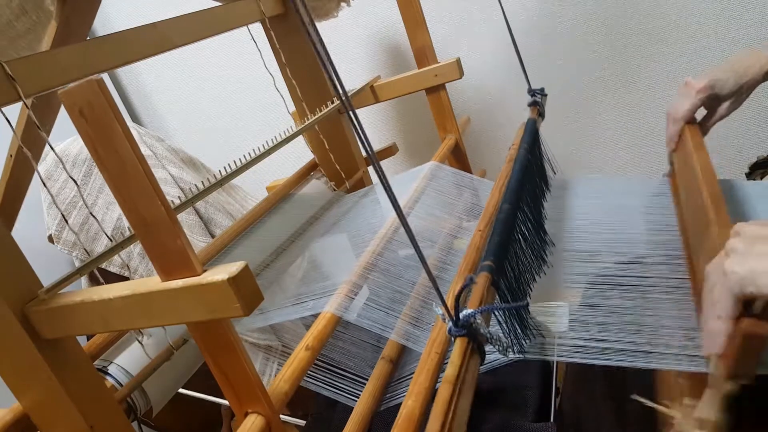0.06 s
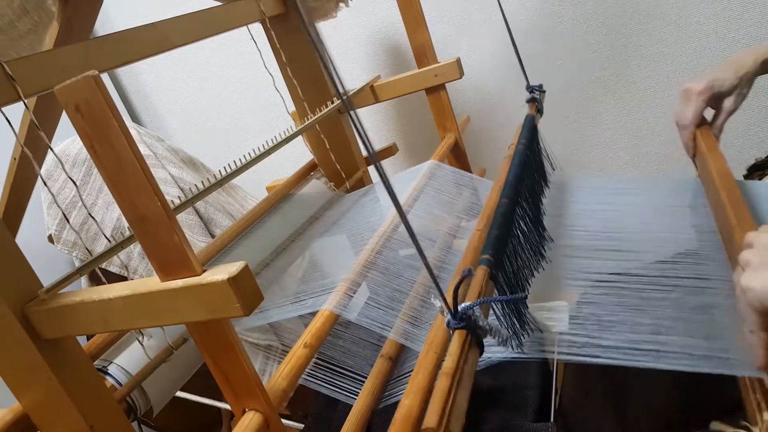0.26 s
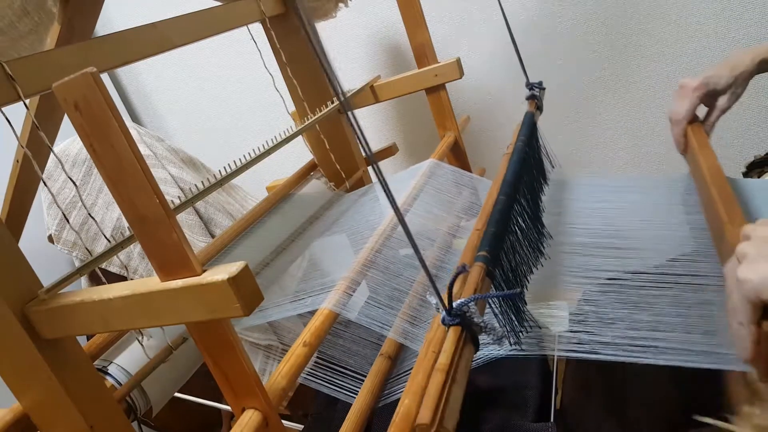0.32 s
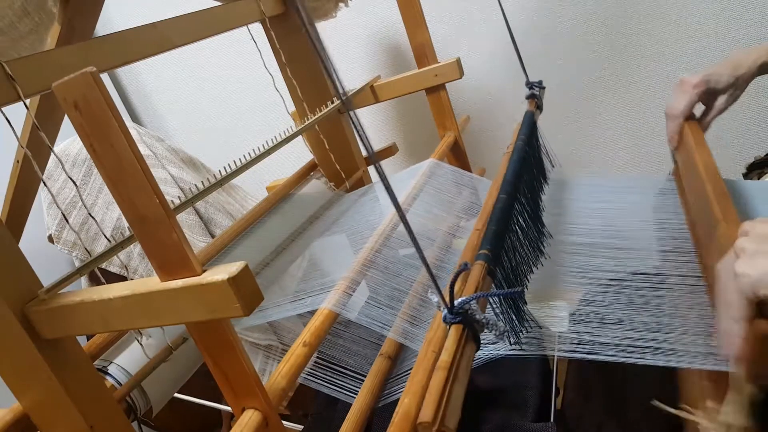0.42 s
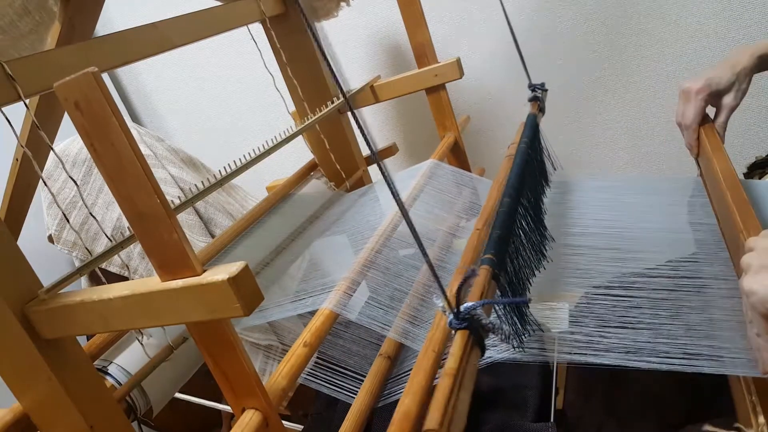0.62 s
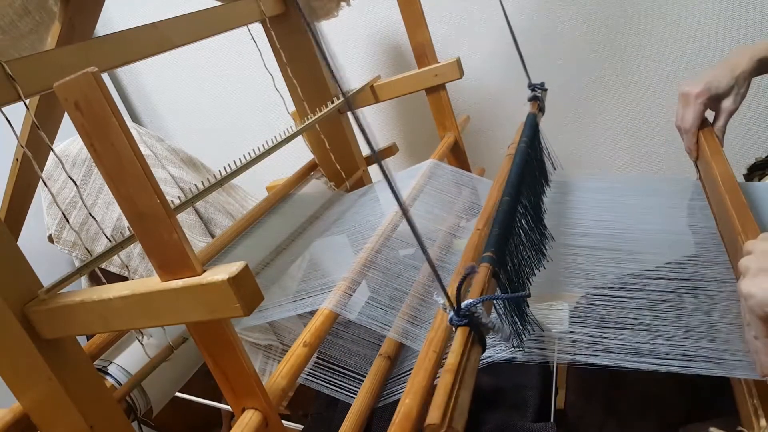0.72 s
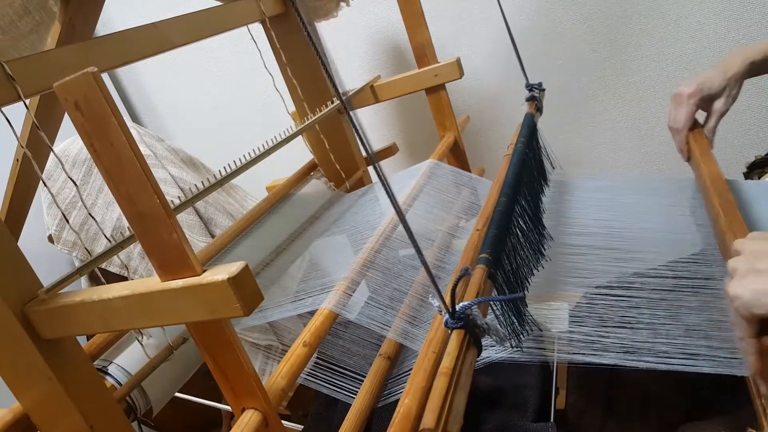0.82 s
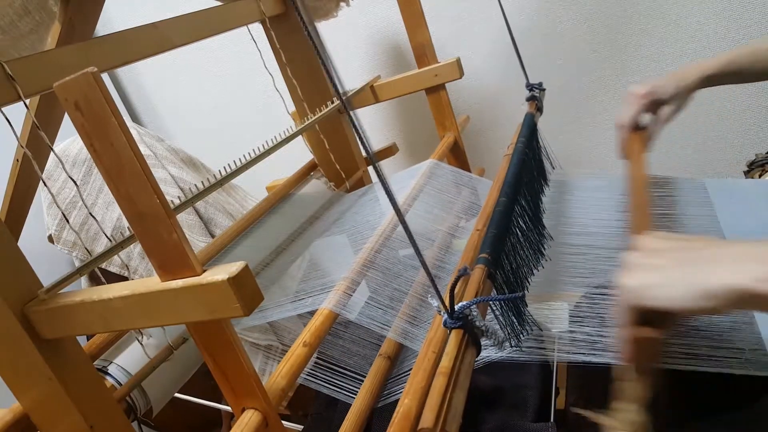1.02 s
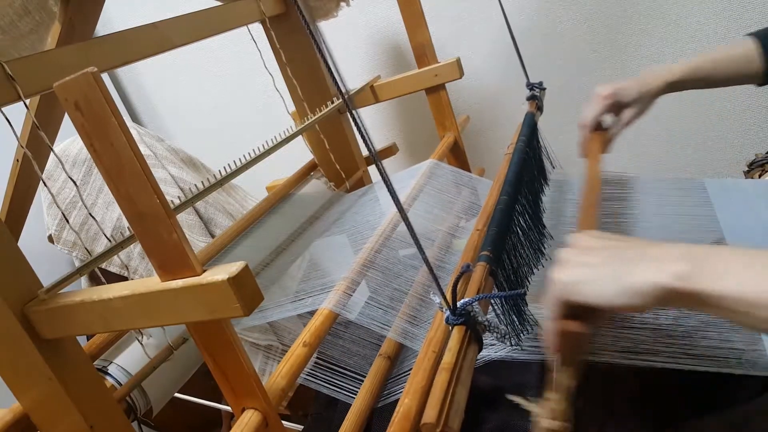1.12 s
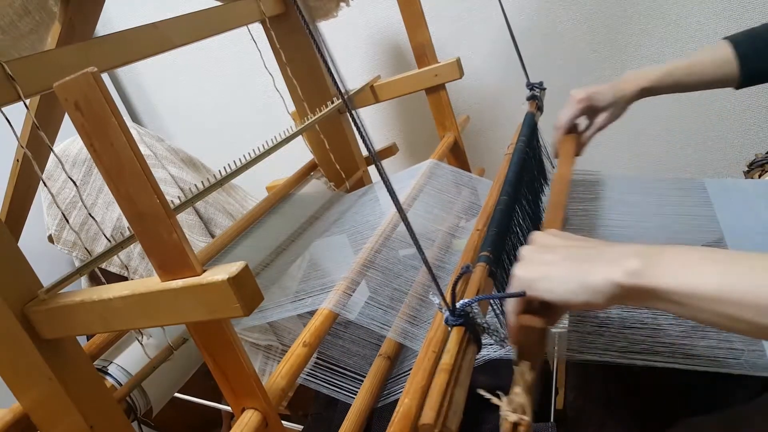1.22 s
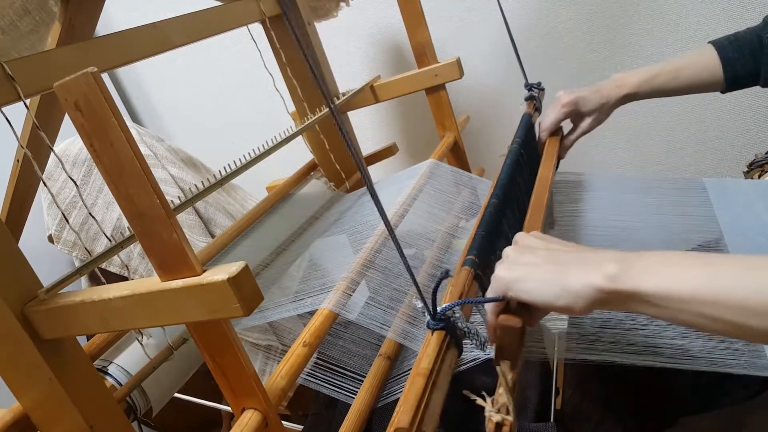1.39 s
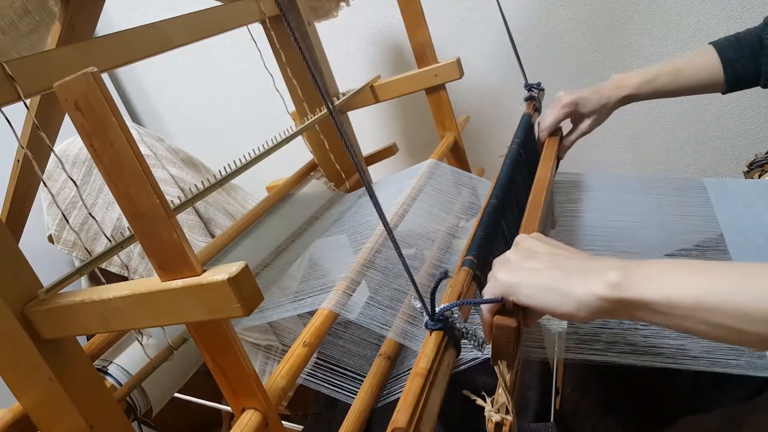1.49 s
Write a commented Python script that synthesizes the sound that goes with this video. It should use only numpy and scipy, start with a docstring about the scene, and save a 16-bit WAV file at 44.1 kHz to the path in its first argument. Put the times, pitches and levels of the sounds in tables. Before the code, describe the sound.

A wooden hand loom, close up in stereo in a small quiet room: the reed frame beats twice, the second harder, each with rattle, thump, knocks and a bright clack, then a lighter clack and soft sliding rustle.

```python
"""A wooden hand loom in a small, quiet room, over a low hush and a faint rumble.
The reed frame is beaten twice against the cloth: bursts of tiny impacts, with decaying sines for the timbers.
Each beat rattles, thumps the loom's body and knocks its joints; a loose hardwood rod then clacks.
The rod clacks once more as the frame is let go; then the reed slides back along the warp threads,
a faint rustle of random ticks and noise."""
import sys
import numpy as np
from scipy import signal
from scipy.fft import rfft, irfft, next_fast_len
from scipy.io import wavfile
from scipy.ndimage import uniform_filter1d

SR = 44100
rng = np.random.default_rng(int(sys.argv[2]) if len(sys.argv) > 2 else 0)


def to_wav(s):
    """Save 16-bit WAV."""
    ch = np.atleast_2d(s).T  # columns
    pcm = np.round(np.clip(ch, -1, 1) * 32767)  # PCM
    wavfile.write(sys.argv[1], SR, pcm.astype(np.int16))


N = 68355

LEAD_S = 0.1  # computed ahead of the start, so that earlier blows still ring there
TIME = np.arange(-int(LEAD_S * SR), N) / SR
SIZE = next_fast_len(2 * len(TIME), real=True) // 2 * 2
HZ = np.maximum(np.fft.rfftfreq(SIZE, 1 / SR), 1)
TREBLE_HZ = 4900
TREBLE_SHELF = HZ ** 2 / (HZ ** 2 + TREBLE_HZ ** 2)  # 0 in the bass to 1 in the treble
MIC_SPACING_M, SOUND_M_PER_S = 0.2, 343


def reed_frame(room):
    """The frame rattles against the cloth and rings briefly."""
    # Contacts in each beat. Each row: start in seconds, level in dB, treble in dB, crunch decay in seconds.
    beats = [(0.2318, -10.5, -5, 0.0027), (0.2388, -7, 7.5, 0.0053), (0.26, -23, -14, 0.0026),
             (0.5808, -2.5, 4, 0.0064), (0.5878, -12, -13, 0.00076), (0.5975, -9, -34, 0.0085),
             (0.608, -12.5, -24, 0.0041)]
    # Colour of the contacts. Each row: frequency in Hz, gain in dB.
    beat_colour = [(60, -14), (130, -3), (250, -2), (380, 11.5), (600, 14), (900, 7), (1400, 10.5),
                   (2300, 10), (3800, 7.5), (6300, 0), (9500, -5), (14000, -11)]
    # Modes of the frame, frequencies in Hz.
    frame_hz = [1287, 1634, 1932, 2055, 2161, 2229, 2423, 2923, 3511]
    mode_db, t60_s = -44, 0.39

    colour_db = at_hz(beat_colour, HZ)
    rattle = sum(contact(colour_db, *row) for row in beats)
    modes = [(hz, mode_db, t60_s) for hz in frame_hz]
    ring = ringing(beats, modes, rise_s=0.002, spread_db=2.5)
    return in_room(rattle, room, direct_db=-2.5, room_db=2.5) + ring


def body():
    """A soft push starts the low modes of the loom together."""
    # Thumps, hardest as the cloth takes a beat. Each row: start in seconds, level in dB.
    thumps = [(0.244, -11.5), (0.422, -28), (0.592, -2)]
    # Low modes of the loom, frequencies in Hz.
    body_hz = [100, 139, 152, 170, 211]
    # Ring of each low mode. Each row: level in dB, T60 in seconds.
    body_ring = [(-53.5, 0.47), (-47, 0.82), (-18.5, .11), (-29.5, 0.3), (-42, 0.49)]
    rise_s = 0.015

    thump = np.zeros(len(TIME))
    for start_s, level_db in thumps:
        age_s = np.maximum(TIME - start_s, 0)
        for hz, (mode_db, t60_s) in zip(body_hz, body_ring):
            envelope = ring_envelope(age_s, rise_s, t60_s)
            thump += amp(level_db + mode_db) * envelope * np.sin(2 * np.pi * hz * age_s)
    return from_loom(thump)


def joints(room):
    """Dull, hollow knocks in the loom's timbers as it rocks."""
    # Knocks. Each row: start in seconds, level in dB, treble in dB, crunch decay in seconds,
    # hollow resonance in Hz, its lift in dB.
    knocks = [(-0.05, -23.5, 1, 0.0073, 397, 10.5), (0.276, -12, 10, 0.0072, 914, 13),
              (0.301, -16, -30, 0.0093, 356, 19), (0.323, -31.5, -24, 0.0031, 347.4, 22.5),
              (0.6208, -8, -3, 0.0046, 950, 2), (0.627, -3, -17, .003, 576, 7.5),
              (0.648, -12.5, -18, 0.0023, 378, 12.5), (0.683, -9, -9, 0.012, 590, 5)]
    # Colour of the knocks. Each row: frequency in Hz, gain in dB.
    knock_colour = [(80, -5.5), (180, 21.5), (250, 8), (360, 16.5), (600, 10), (950, 18), (1400, 13),
                    (2500, 8.5), (5000, -7), (14000, -47)]
    # Modes of the timbers, frequencies in Hz.
    joint_hz = [331, 376, 422, 583, 612, 749, 961, 1060]
    # Ring of each mode. Each row: level in dB, T60 in seconds.
    joint_ring = [(-38.5, 0.35), (-36, 0.29), (-56, 0.37), (-39, 0.25), (-35.5, 0.3), (-41, 0.22),
                  (-38.5, 0.55), (-55, 0.45)]
    hollow_octaves = 0.16  # half-width of the resonance

    colour_db = at_hz(knock_colour, HZ)
    knocking = 0
    for *blow, hollow_hz, lift_db in knocks:
        hollow_db = lift_db / (1 + (np.log2(HZ / hollow_hz) / hollow_octaves) ** 2)
        knocking = knocking + contact(colour_db + hollow_db, *blow)
    modes = [(hz, *mode) for hz, mode in zip(joint_hz, joint_ring)]
    ring = ringing(knocks, modes, rise_s=0.0027, spread_db=3)
    return in_room(knocking, room, direct_db=-4, room_db=-3.5) + ring


def rod(room):
    """A sharp clack and a clear wooden ring, whose balance depends on where the rod is struck."""
    # Clacks. Each row: start in seconds, level in dB, treble in dB, crunch decay in seconds,
    # ring level in dB, ring brightness in dB per octave.
    clacks = [(-0.03, -15, -5, 0.00081, -14, 7), (0.3491, -4.5, 2.5, 0.0026, -2.5, 5.5),
              (0.6869, -4, 6, 0.0012, -4.5, -11), (0.8702, -12.5, -3, 0.004, -18, 11.5)]
    # Colour of the clacks. Each row: frequency in Hz, gain in dB.
    clack_colour = [(100, -9.5), (250, -2), (600, 0.5), (1000, 10), (1400, -2), (1760, 17), (2050, 0.5),
                    (2350, 7), (2620, 16), (2950, 1), (3700, 0), (4500, -4), (4950, 1.5), (5700, -4.5),
                    (7500, -9.5), (9300, -9.5), (11000, -9), (14500, -20.5)]
    # Modes of the rod, frequencies in Hz.
    rod_hz = [1742, 1787, 2506, 2579, 2613, 2686, 2780, 3520]
    # Ring of each mode. Each row: level in dB, T60 in seconds.
    rod_ring = [(-38, 0.37), (-36.5, 0.35), (-38, 0.25), (-29.5, 0.13), (-36, 0.3), (-40, 0.36), (-47, .3),
                (-48.5, 0.17)]
    pivot_hz = 2150  # brightness tilts about here

    colour_db = at_hz(clack_colour, HZ)
    clacking, ring = 0, 0
    for *blow, ring_db, tilt_db in clacks:
        clacking = clacking + contact(colour_db, *blow)
        modes = [(hz, mode_db + tilt_db * np.log2(hz / pivot_hz), t60_s)
                 for hz, (mode_db, t60_s) in zip(rod_hz, rod_ring)]
        ring = ring + ringing([(blow[0], ring_db)], modes, rise_s=0.00033, spread_db=1)
    return in_room(clacking, room, direct_db=0.5, room_db=1.5) + ring


def warp():
    """Threads catch and slip on the reed in dense, tiny ticks, over an equal share of noise."""
    # Reed rubbing along the warp. Each row: time in seconds, level in dB.
    slide = [(0, -62.5), (.17, -69.5), (.5, -66), (.8, -81), (1.04, -72), (1.12, -65.5), (1.23, -67.5),
             (1.34, -61.5), (1.47, -64), (1.55, -69.5)]
    # Colour of the rustle. Each row: frequency in Hz, gain in dB.
    slide_colour = [(200, -22), (700, -1), (1000, 4.5), (1450, 6.5), (1630, 12), (1850, 6.5), (2200, 3),
                    (3200, 5), (4200, 1.5), (5500, -3), (7000, -11), (10000, -11), (14500, -18)]
    ticks_per_s, tick_spread_db = 7500, 3
    flutter_db, flutter_s = 1.3, 0.018  # the reed catches and slips as it goes

    shape = (2, len(TIME))
    struck = rng.random(shape) < ticks_per_s / SR
    strength = amp(tick_spread_db * rng.standard_normal(shape))
    ticks = struck * strength * rng.choice([-1, 1], shape)
    rustle = ticks / ticks.std() + rng.standard_normal(shape)
    flutter = uniform_filter1d(rng.standard_normal(len(TIME)), int(flutter_s * SR))
    level_db = np.interp(TIME, *np.transpose(slide)) + flutter_db * flutter / flutter.std()
    return coloured(diffuse(rustle / rustle.std()), at_hz(slide_colour, HZ)) * amp(level_db)


def contact(colour_db, start_s, level_db, treble_db, length_s):
    """A few milliseconds of tiny, uneven impacts with an even spectrum, coloured by the wood."""
    rise_s, grain_db = 0.0011, 5
    tail = 2.33  # slower decay that bounds the flattened crunch, in lengths
    noise, size = rng.standard_normal((2, len(TIME)))
    envelope = dying(start_s, length_s) * (1 - dying(start_s, rise_s))
    crunch = noise * amp(grain_db * size) * envelope
    for _ in range(2):  # flatten the spectrum, then confine it in time again
        spectrum = rfft(crunch, SIZE)
        flat = irfft(spectrum / (np.abs(spectrum) + 1e-9), SIZE)[:len(TIME)]
        crunch = flat * dying(start_s, tail * length_s)
    return coloured(crunch / np.linalg.norm(crunch), level_db + colour_db + treble_db * TREBLE_SHELF)


def ringing(blows, modes, rise_s, spread_db):
    """Each blow sets every mode ringing; higher modes reach the two microphones less alike."""
    out = np.zeros((2, len(TIME)))
    for start_s, level_db, *_ in blows:
        age_s = np.maximum(TIME - start_s, 0)
        for hz, mode_db, t60_s in modes:
            strength, apart = rng.standard_normal(2)
            apart *= min(np.pi * hz * MIC_SPACING_M / SOUND_M_PER_S / 2, 1)
            phase = rng.uniform(0, 2 * np.pi) + apart * np.array([[1], [-1]])
            gain = amp(level_db + mode_db + spread_db * strength)
            envelope = ring_envelope(age_s, rise_s, t60_s)
            out += gain * envelope * np.sin(2 * np.pi * hz * age_s + phase)
    return out


def ring_envelope(age_s, rise_s, t60_s):
    """Smooth rise, then a fall of 60 dB per T60."""
    return (1 - np.exp(-age_s / rise_s)) * np.exp(-np.log(1000) * age_s / t60_s)


def dying(start_s, length_s):
    """Sudden start, exponential fall."""
    return (TIME >= start_s) * np.exp(-np.maximum(TIME - start_s, 0) / length_s)


def in_room(x, room, direct_db, room_db):
    """Direct sound plus reverberation."""
    return amp(direct_db) * from_loom(x) + amp(room_db) * filtered(x, room)


def from_loom(x):
    """Direct sound, treble beamed at the microphones: first at the right one, louder at the left."""
    left_lag_s, left_louder_db, beamed_treble_db = 0.0002527, 1.8, 1
    x = coloured(x, beamed_treble_db * TREBLE_SHELF)
    left = filtered(x, np.exp(-2j * np.pi * HZ * left_lag_s)) * amp(left_louder_db / 2)
    right = x * amp(-left_louder_db / 2)
    return np.array([left, right])


def room_response():
    """Reverberation that dies band by band, with a cluster of early wall echoes; even in broad colour."""
    # Decay of the room. Each row: band centre in Hz, T60 in seconds.
    room_t60 = [(100, 0.4), (250, 0.28), (600, 0.36), (1200, 0.33), (2500, 0.27), (5000, 0.2), (8000, 0.19),
                (14000, 0.1)]
    build_s, even_hz = 0.001, 109
    echo_s, echo_length_s, echo_db = 0.014, 0.002, 0

    age_s = TIME - TIME[0]
    noise = rfft(diffuse(rng.standard_normal((2, len(TIME)))), SIZE)
    log_centres = np.log([hz for hz, _ in room_t60])
    tail = 0
    for share, (_, t60_s) in zip(np.eye(len(room_t60)), room_t60):
        weight = np.interp(np.log(HZ), log_centres, share)  # overlapping bands
        band = irfft(noise * weight, SIZE)[:, :len(TIME)]
        tail = tail + band * np.exp(-np.log(1000) * age_s / t60_s)
    echoes = amp(echo_db) * dying(TIME[0] + echo_s, echo_length_s)
    tail = tail * (1 - np.exp(-age_s / build_s)) * (1 + echoes)
    power = uniform_filter1d(np.abs(rfft(tail, SIZE)) ** 2, int(even_hz * SIZE / SR))
    even = [coloured(side, -10 * np.log10(p + 1e-9)) for side, p in zip(tail, power)]
    return rfft(even, SIZE)


def room_hush():
    """Room tone: steady coloured noise from all sides."""
    # Spectrum of the room tone. Each row: frequency in Hz, level in dB.
    hush = [(20, -75), (50, -58), (70, -52.5), (100, -54), (140, -51), (240, -46), (330, -56), (600, -56.5),
            (1500, -72), (4000, -73.5), (14000, -80.5)]
    return coloured(diffuse(rng.standard_normal((2, len(TIME)))), at_hz(hush, HZ))


def faint_rumble():
    """Low noise, separate at each microphone."""
    # Spectrum of the rumble. Each row: frequency in Hz, level in dB.
    rumble = [(15, -43.5), (33, -48.5), (50, -64), (70, -53), (110, -60), (300, -100)]
    return coloured(rng.standard_normal((2, len(TIME))), at_hz(rumble, HZ))


def diffuse(pair):
    """Two unrelated signals as sound from all sides: alike in the bass, unrelated in the treble."""
    alike = np.sinc(2 * HZ * MIC_SPACING_M / SOUND_M_PER_S)
    mid = filtered(pair[0], np.sqrt((1 + alike) / 2))
    side = filtered(pair[1], np.sqrt((1 - alike) / 2))
    return np.array([mid + side, mid - side])


def coloured(x, db):
    """Causal (minimum-phase) filter with the given gain at each frequency."""
    cepstrum = irfft(np.log(amp(db)), SIZE)
    cepstrum[1:SIZE // 2] *= 2
    cepstrum[SIZE // 2 + 1:] = 0
    return filtered(x, np.exp(rfft(cepstrum)))


def filtered(x, response):
    """Apply a frequency response."""
    return irfft(rfft(x, SIZE) * response, SIZE)[..., :len(TIME)]


def at_hz(points, hz):
    """Read a table on a log-frequency axis."""
    table_hz, value = np.transpose(points)
    return np.interp(np.log(hz), np.log(table_hz), value)


def amp(db):
    """Decibels to gain."""
    return 10 ** (np.asarray(db) / 20)


def scene():
    """The loom in its room, over a low hush and rumble."""
    room = room_response()
    loom = reed_frame(room) + body() + joints(room) + rod(room) + warp()
    return (loom + room_hush() + faint_rumble())[:, -N:]


def record(dry):
    """The top is cut steeply."""
    cutoff_hz, ripple_db, stop_db = 14700, 0.3, 70
    low_pass = signal.ellip(10, ripple_db, stop_db, cutoff_hz, fs=SR, output="sos")
    return signal.sosfilt(low_pass, dry)


dry = scene()
out = record(dry)
to_wav(out)
```